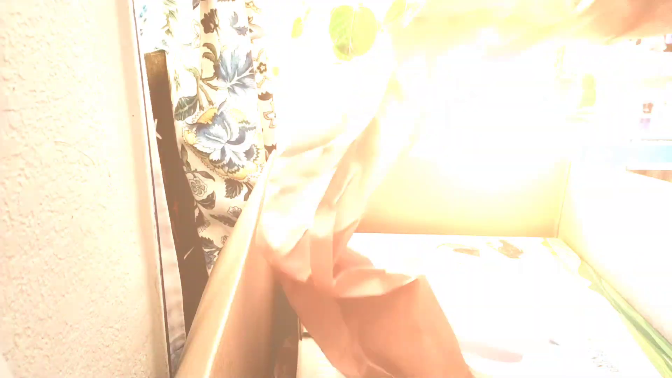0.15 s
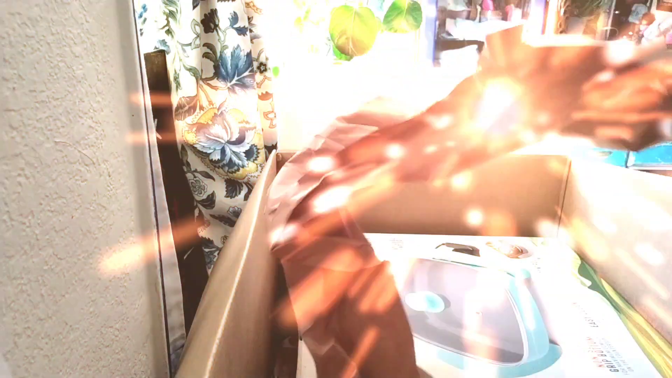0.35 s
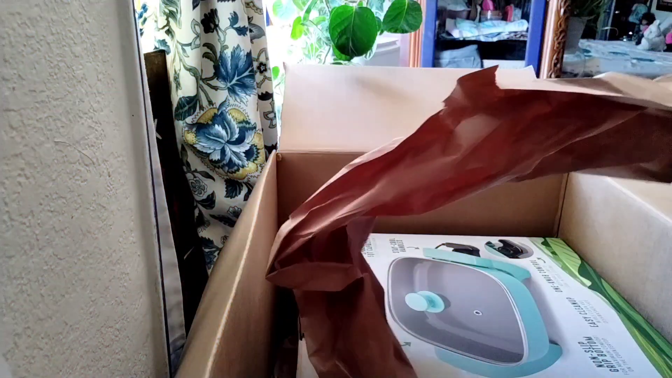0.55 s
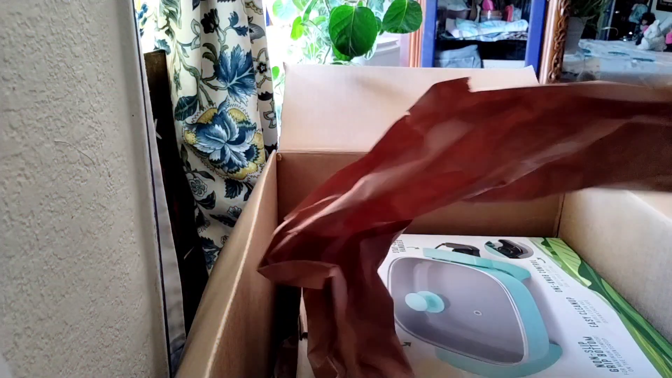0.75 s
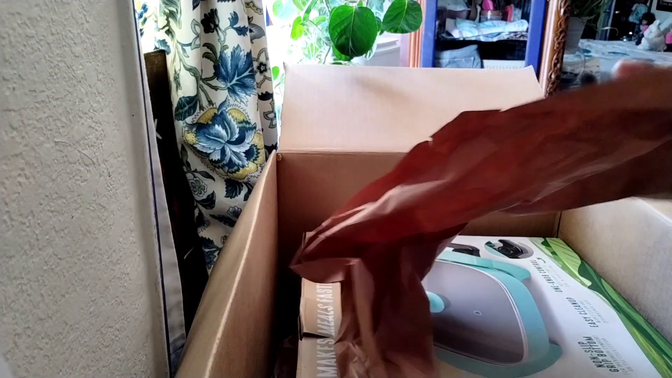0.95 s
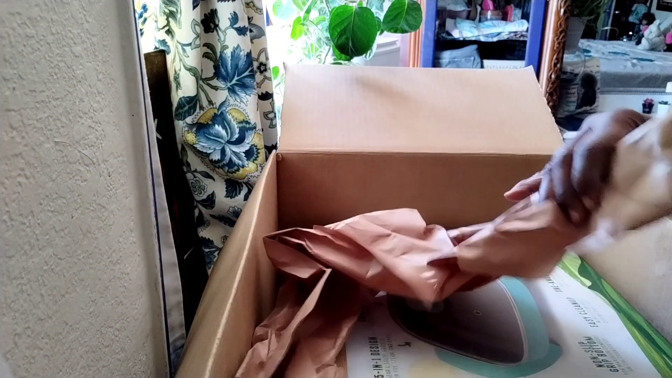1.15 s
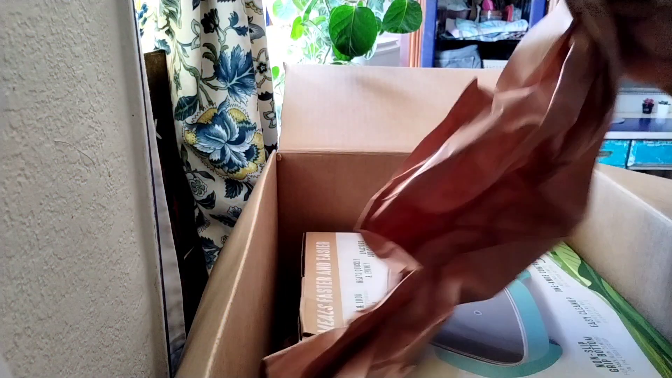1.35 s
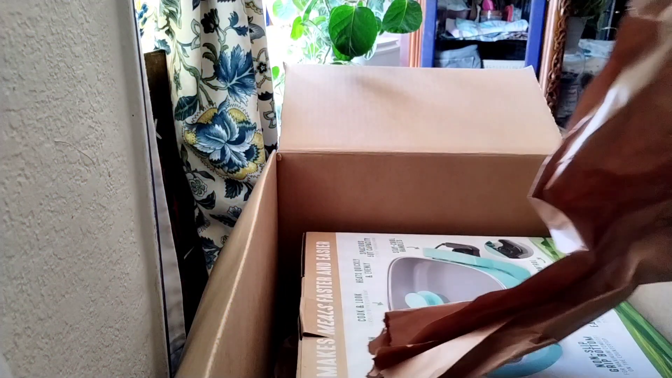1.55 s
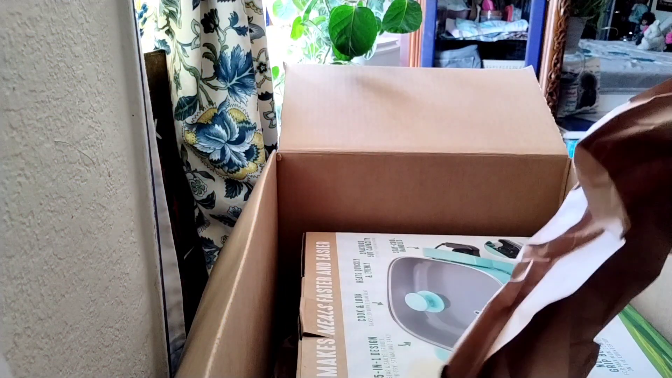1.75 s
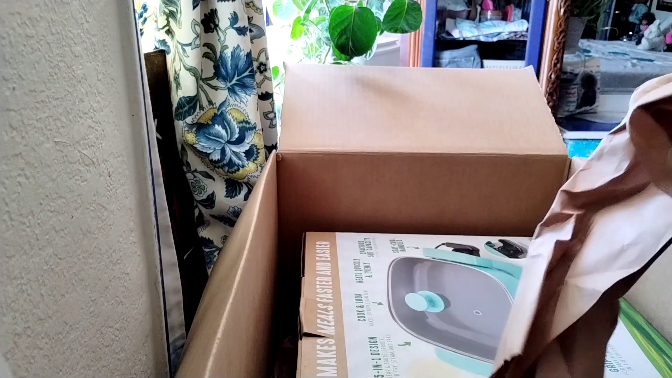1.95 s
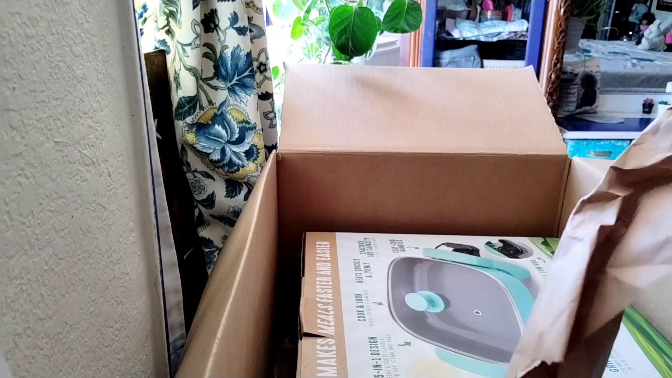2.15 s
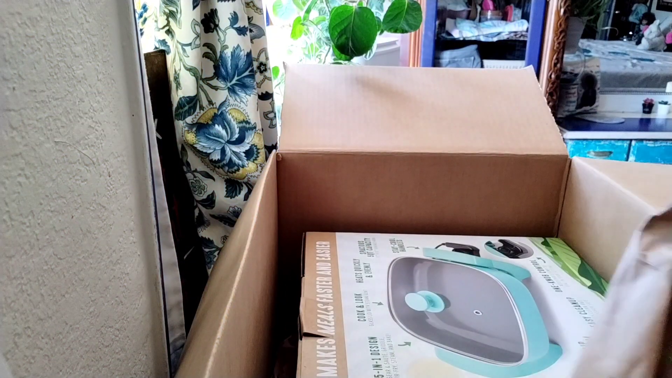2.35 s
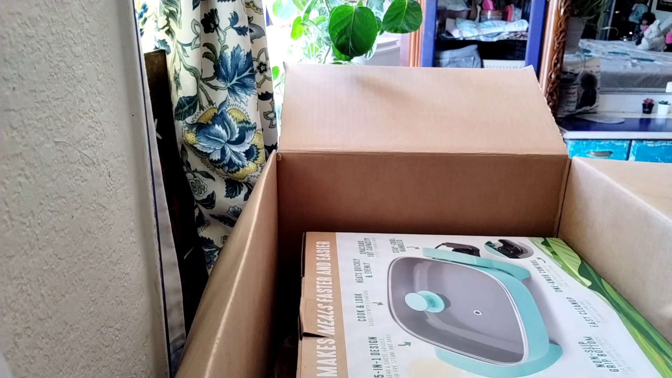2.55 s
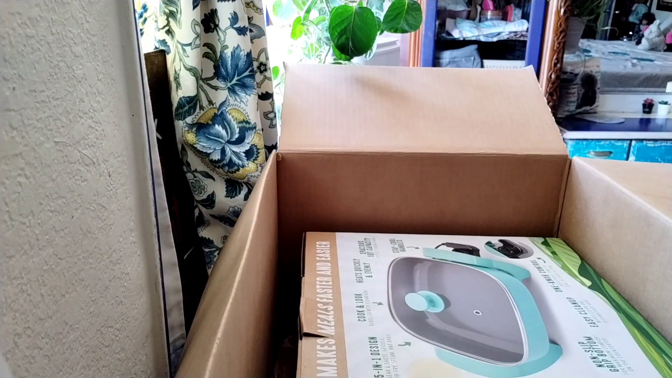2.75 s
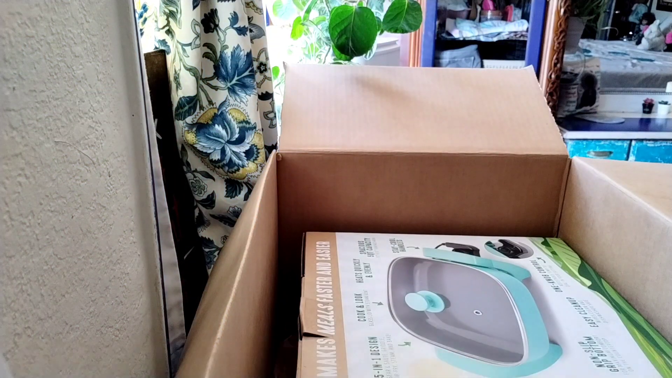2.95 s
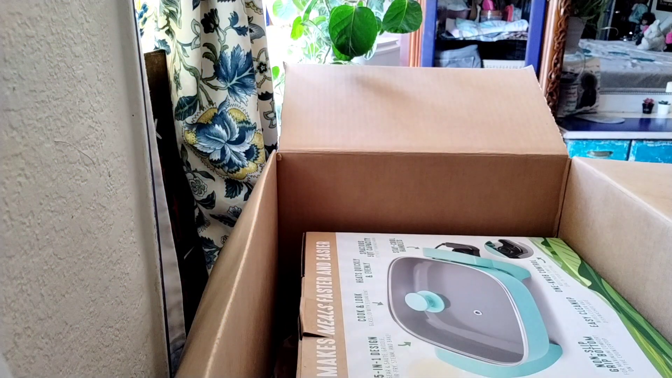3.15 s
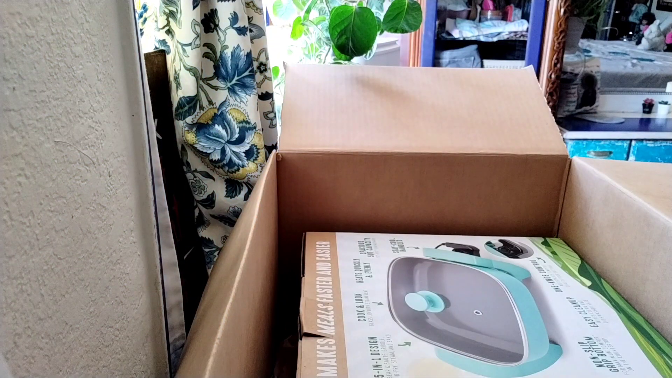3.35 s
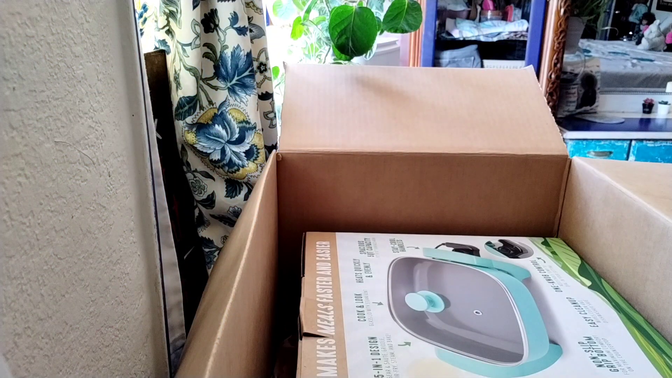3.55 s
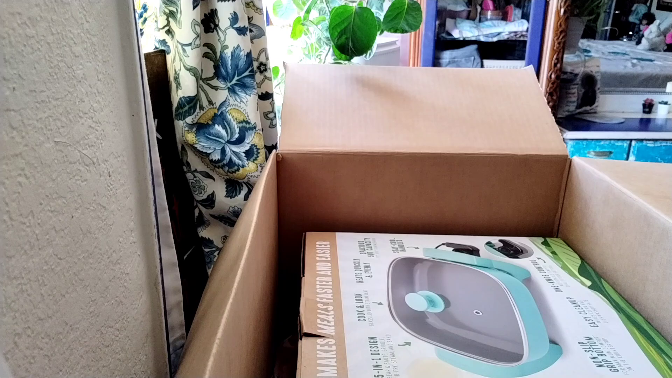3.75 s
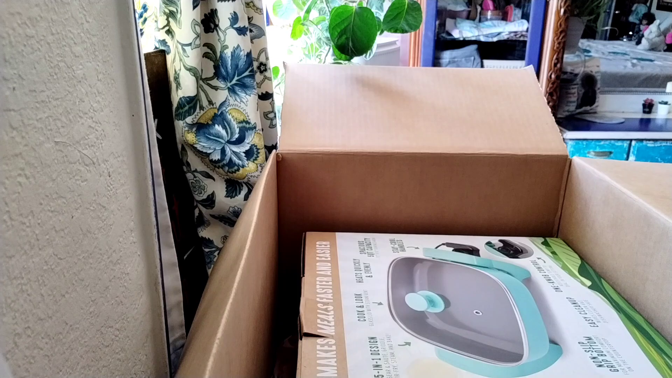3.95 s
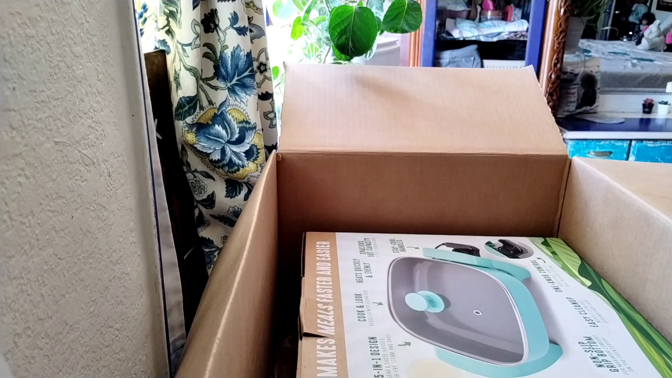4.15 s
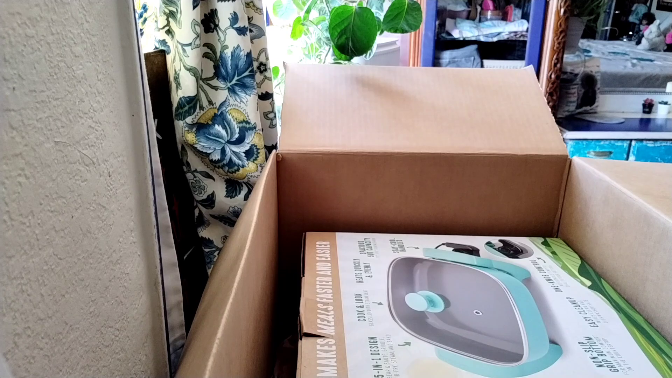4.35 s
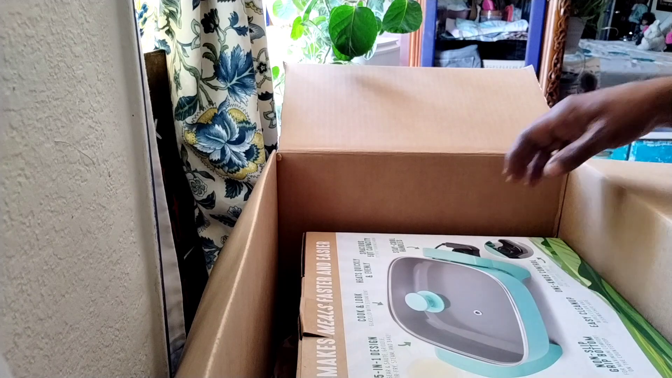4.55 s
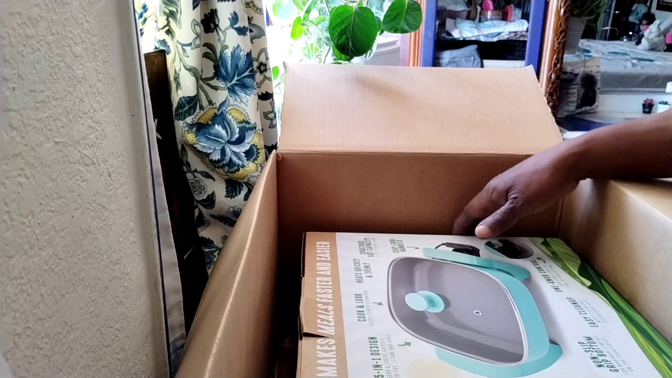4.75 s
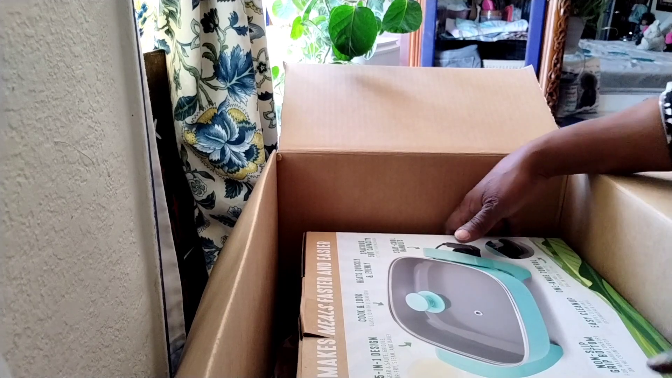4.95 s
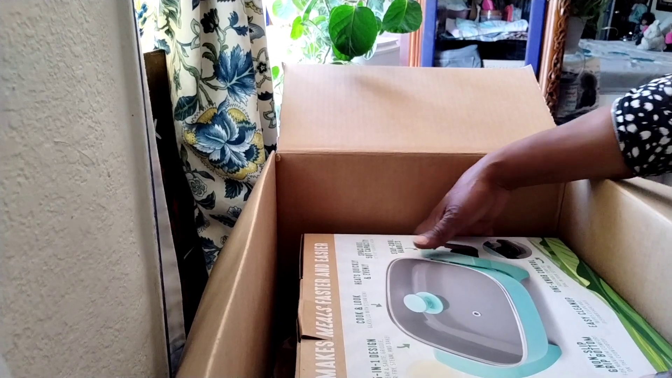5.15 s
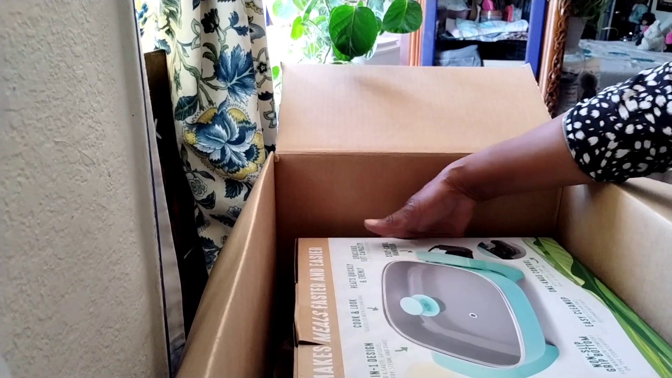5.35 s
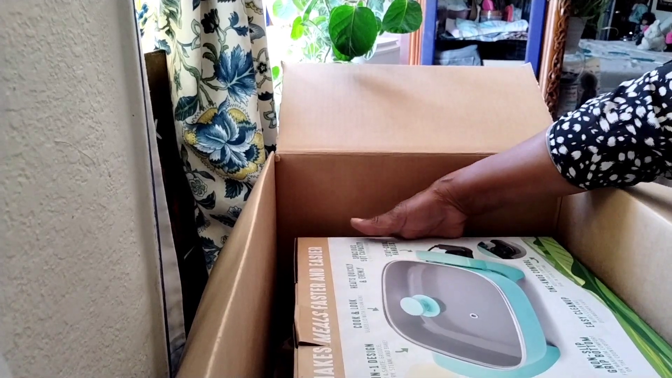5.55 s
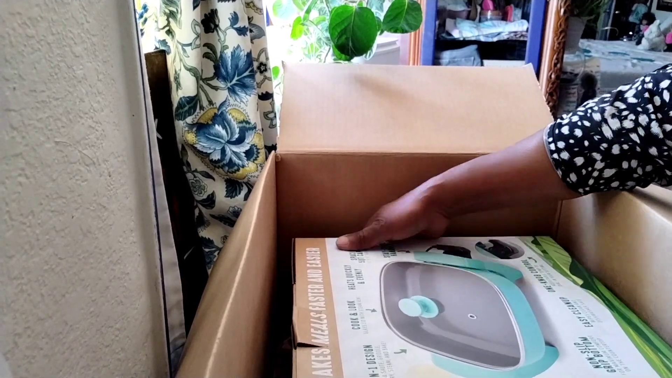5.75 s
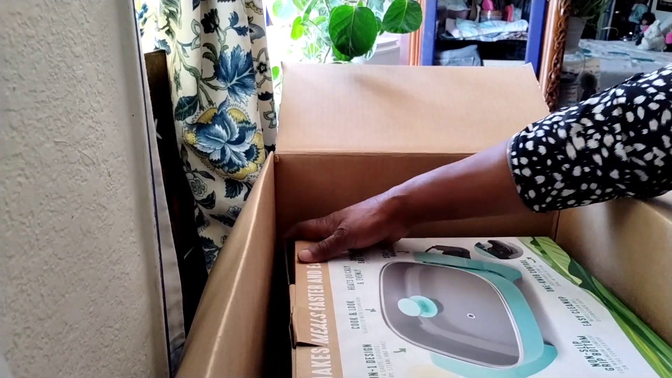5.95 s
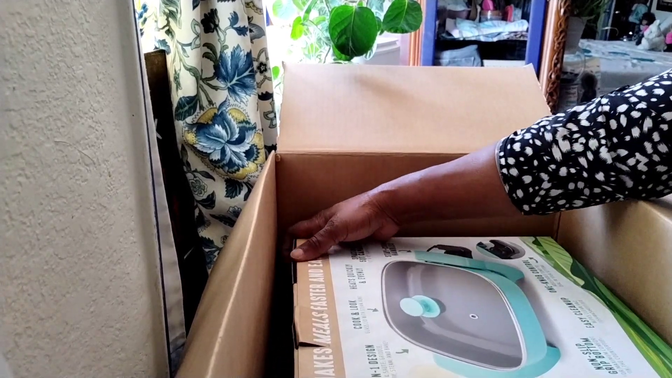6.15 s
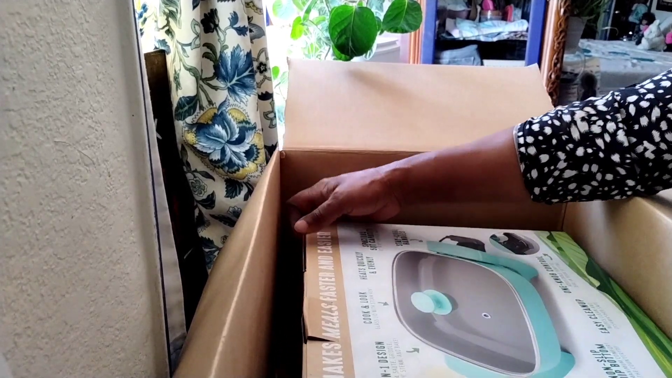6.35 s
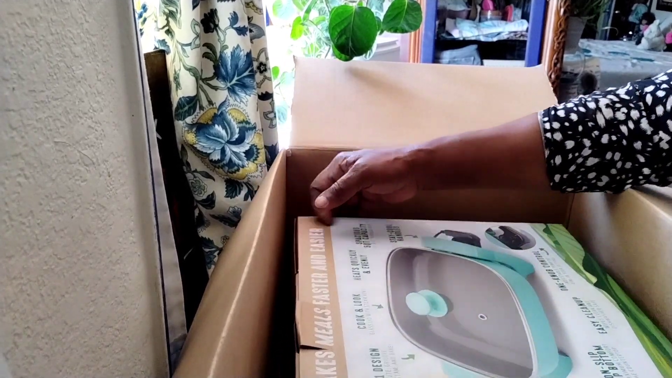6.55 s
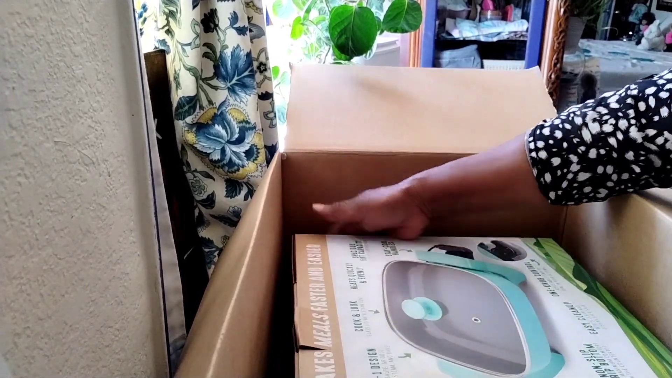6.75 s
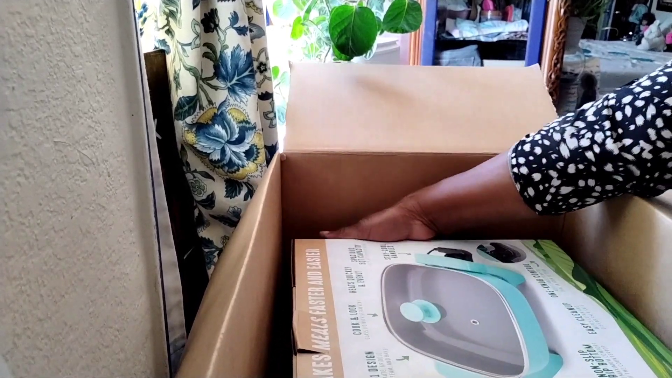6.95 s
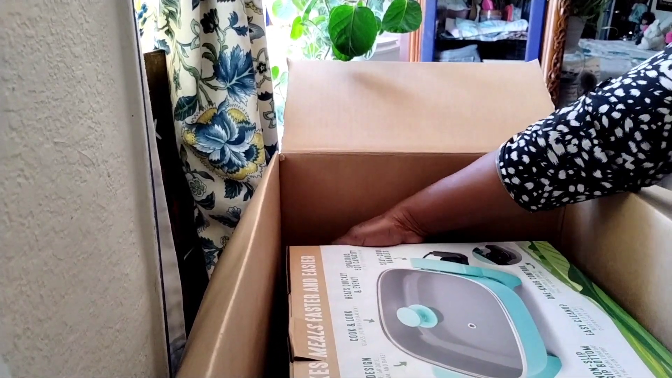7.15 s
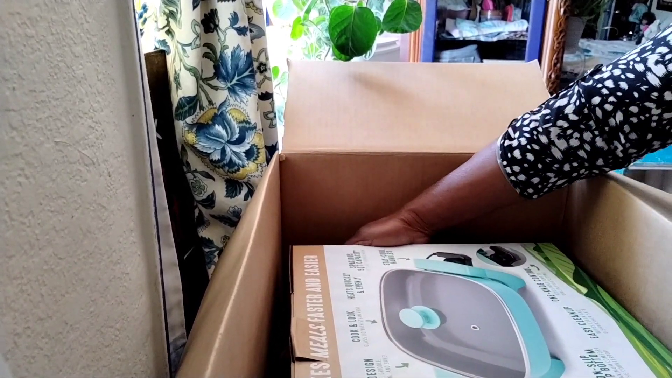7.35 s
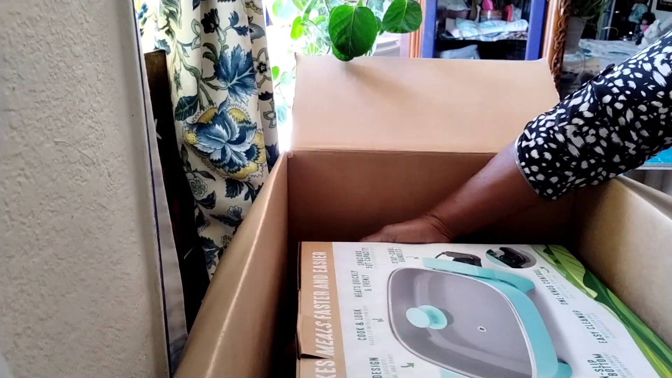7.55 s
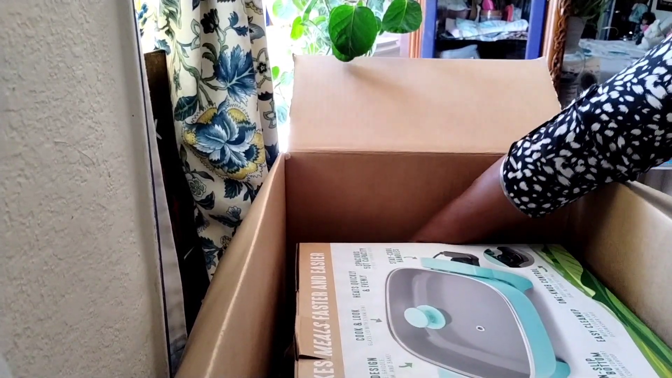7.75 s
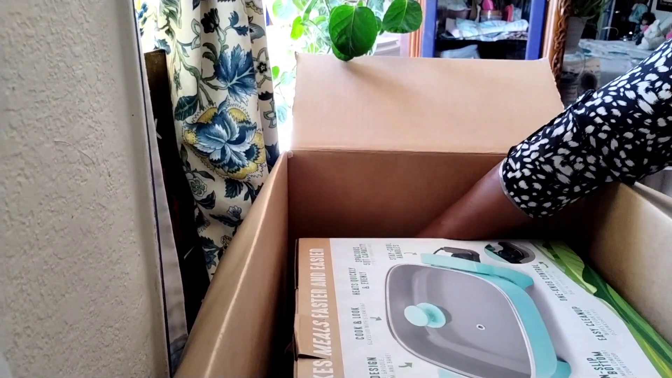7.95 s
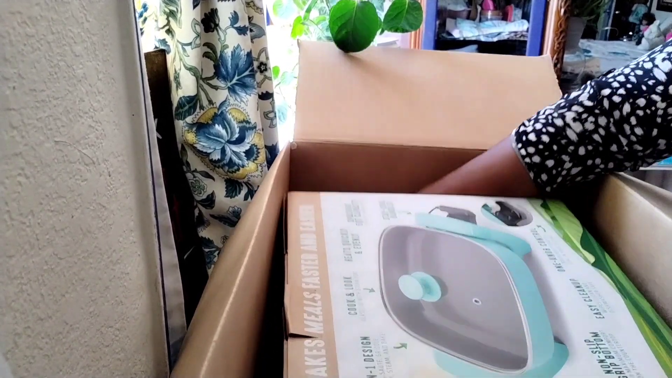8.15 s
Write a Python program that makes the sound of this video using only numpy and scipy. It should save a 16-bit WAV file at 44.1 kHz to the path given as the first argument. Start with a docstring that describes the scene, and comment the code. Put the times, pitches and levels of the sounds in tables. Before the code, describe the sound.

Close to the microphone, stiff packing paper is yanked from a cardboard box with loud, bright crackles and sharp snaps for under three seconds. The dropped sheet settles with sparse faint pops. Then a sleeve and hand brush the cardboard, with light scrapes, dry ticks and hollow knocks, one clearly stronger in the middle of that handling. A distant engine hums low, slowly rising, under quiet room tone.

```python
"""Stiff packing paper is dragged from a cardboard box, crumples and settles on a small room's floor.
Then an arm reaches in: sleeve and hand rub the walls; the carton inside is nudged, lifted and drops back.
Outside, an engine slowly gathers speed over the noise of the quiet room.
Creases, cloth and cardboard are shaped noise bursts; folds, panel modes and engine orders are sines."""
import sys
import numpy as np
from scipy import signal
from scipy.fft import rfft, irfft, next_fast_len
from scipy.io import wavfile

SR = 44100
rng = np.random.default_rng(int(sys.argv[2]) if len(sys.argv) > 2 else 0)


def bounce(signal):
    """Save signal as a 16-bit WAV file at the path given by the first command-line argument."""
    frames = np.transpose(np.atleast_2d(signal))
    limited = np.clip(frames, -1, 1)
    pcm = np.round(limited * 32767).astype(np.int16)
    wavfile.write(sys.argv[1], SR, pcm)


N = 361619
TIME = np.arange(N) / SR
TAIL = TIME[:2 ** 14]

# Levels in the tables are relative: source gains and filters follow.
# tugs on the paper: start_s, length_s, rustle_db, flapping_db
TUGS = [(-0.02, 0.054, -20.5, -41), (0.046, 0.25, -21, -42), (0.168, 0.19, -20.5, -40),
        (0.343, 0.025, -12, -35), (0.38, 0.046, -12.5, -35.5), (0.444, 0.14, -20.5, -45.5),
        (0.51, 0.13, -20.5, -41.5), (0.574, 0.11, -17, -46.5), (0.699, 0.078, -16.5, -44),
        (0.773, 0.11, -22.5, -43), (0.885, 0.28, -20, -47), (1.073, 0.2, -14, -35.5),
        (1.261, 0.25, -19, -43), (1.481, 0.048, -27, -45.5), (1.537, 0.59, -19, -44),
        (1.82, 0.32, -21.5, -46.5), (2.18, 0.64, -29.5, -53), (2.38, 0.37, -24.5, -58),
        (2.63, 0.13, -25.5, -46.5), (2.767, 0.04, -49, -38.5)]
# sheet tail dragging over the flap edge: start_s, length_s, level_db
FLAP_DRAGS = [(2.562, 0.06, -33), (2.62, 0.07, -41), (2.69, 0.1, -35), (2.77, 0.2, -49)]
# big creases snapping through: start_s, level_db, pitch_hz, fall_s
SNAPS = [(0.1913, -5.5, 2900, .0035), (0.23, -15, 2450, 0.0025), (0.3414, -8.5, 6040, 0.0026),
         (0.3605, -3.5, 8670, 0.0039), (0.3903, -12, 3440, .004), (0.4, -6.5, 8050, 0.0046),
         (0.4347, -3, 8500, 0.0028), (0.4839, -4, 9000, 0.0021), (0.5305, -5, 4000, 0.0038),
         (0.6368, -3, 8000, 0.0016), (0.659, -6.5, 7000, 0.0036), (0.7188, -9, 5370, 0.0021),
         (0.7312, -5.5, 8660, 0.0027), (0.741, -10.5, 7000, .004), (0.7844, -10, 4300, 0.0024),
         (0.7984, -4.5, 2780, 0.0016), (1.0041, -9, 7150, 0.0048), (1.0914, -7.5, 4460, .003),
         (1.0976, -5, 9260, .003), (1.114, -4, 4500, 0.0026), (1.1857, -3, 6900, 0.0036),
         (1.2589, -4.5, 2820, 0.0048), (1.3096, -12, 4600, .003), (1.3653, -2.5, 6400, 0.0031),
         (1.483, -2, 9100, 0.0014), (1.6533, -13.5, 7400, 0.0052), (1.6853, -4.5, 6750, 0.0046),
         (1.715, -1, 3480, 0.0022), (1.7458, -6.5, 8600, 0.004), (1.7787, -5, 2860, 0.0017),
         (1.784, -7.5, 3500, 0.0041), (1.878, -4, 4860, 0.0031), (1.8936, -4, 7400, 0.0035),
         (1.927, -4, 7500, 0.0033), (1.942, -11, 5000, 0.0018), (1.9664, -2.5, 4190, 0.0016),
         (2.0611, -4.5, 2550, 0.0027), (2.083, -5, 5370, 0.0026), (2.088, -2.5, 7900, 0.0026),
         (2.097, -3, 8060, 0.0022), (2.1431, -2, 7500, 0.0019), (2.261, -24, 2380, 0.0047),
         (2.3965, -6, 8360, 0.0021), (2.4414, -5.5, 3700, 0.0015), (2.4573, -14, 5870, 0.0032),
         (2.472, -8, 2430, .002), (2.5711, -10, 8540, 0.0013), (2.6355, -11, 7500, 0.0018),
         (2.6545, -7.5, 2070, 0.0038), (2.721, -15, 4500, 0.007)]
# sheet unfolding in fits on the floor: start_s, length_s, level_db
UNFOLDINGS = [(2.904, 0.083, -28.5), (3.0, 0.46, -43), (3.216, 0.018, -38), (3.36, 0.11, -39.5),
              (3.525, 0.038, -37.5), (3.575, 0.11, -36), (3.82, 0.053, -34), (3.945, 0.036, -41)]
# folds of the fallen sheet popping open: start_s, level_db, pitch_hz
POPS = [(2.9117, -21, 2070), (2.952, -18.5, 2840), (3.0536, -29, 2560), (3.2162, -18.5, 2500),
        (3.3505, -37, 2300), (3.3841, -29, 5990), (3.4834, -32.5, 2400), (3.527, -21.5, 2340),
        (3.6284, -29, 2500), (3.7435, -32.5, 2540), (3.8233, -26, 8800), (3.8571, -23.5, 8900),
        (3.9497, -30, 3030)]
# sleeve strokes along the box: start_s, length_s, level_db
SLEEVE_STROKES = [(4.06, 0.27, -45), (4.14, 0.2, -33.5), (4.32, 0.14, -30), (4.46, 0.25, -35.5),
                  (4.745, 0.15, -30), (4.87, 0.12, -34), (4.98, 0.091, -31.5), (5.09, 0.24, -38),
                  (5.33, 0.14, -36.5), (5.44, 0.14, -41.5), (5.52, 0.22, -52), (5.8, 0.17, -37),
                  (5.99, 0.081, -37), (6.255, 0.13, -41), (6.38, 0.27, -44), (6.57, 0.05, -33),
                  (6.62, 0.17, -40), (6.78, 0.19, -35.5), (7.21, 0.11, -37), (7.48, 0.12, -53.5),
                  (7.7, 0.14, -50), (7.76, 0.19, -41), (8.0, 0.62, -36)]
# cuff rasping on a cut cardboard edge: start_s, length_s, level_db
RASPS = [(4.352, 0.025, -23.5), (4.79, 0.23, -40), (5.41, 0.031, -34), (6.605, 0.027, -31.5),
         (6.742, 0.023, -30), (7.03, 0.028, -30), (7.88, 0.046, -33.5), (8.14, 0.072, -28.5)]
# shoves scraping the carton along the wall: start_s, length_s, level_db
SHOVES = [(4.75, 0.13, -32.5), (5.01, 0.13, -39), (5.29, 0.25, -42), (5.45, 0.29, -53), (5.55, 0.62, -54),
          (6.2, 0.54, -44), (6.58, 0.22, -36.5), (6.85, 0.075, -38), (6.99, 0.22, -40), (7.17, 0.18, -38.5),
          (7.46, 0.18, -48), (7.77, 0.2, -44), (7.87, 0.081, -42), (7.99, 0.26, -38), (8.09, 0.18, -40)]
# low shudder of the walls under the arm: time_s, level_db
SHUDDER = [(4.06, -81), (4.44, -53.5), (4.7, -57.5), (5.77, -44), (6.36, -52.5), (6.72, -45.5),
           (6.96, -49.5), (7.28, -48.5), (7.4, -54), (7.56, -52), (7.66, -76), (7.71, -56), (8.19, -60)]
# knocks on cardboard: start_s, level_db, tick_db, panel_pitch_hz
KNOCKS = [(4.495, -30.5, -26, 1210), (5.016, -17.5, -15.5, 620), (5.092, -27.5, -22, 560),
          (5.311, -30.5, -31, 454), (5.848, -32, -50, 890), (5.887, -28.5, -28.5, 610),
          (6.008, -25.5, -38, 890), (6.02, -22.5, -30.5, 645), (6.087, -31, -67, 583),
          (6.178, -33, -39, 418), (6.225, -30, -53, 634), (6.26, -31.5, -32.5, 680), (6.473, -30, -33, 600),
          (6.5657, -11.5, -10.5, 472), (6.571, -13, -23, 1670), (6.577, -20, -41, 740),
          (6.725, -30, -29, 605), (7.009, -23.5, -21.5, 480), (7.048, -48, -24, 594),
          (7.271, -26, -51, 500), (7.361, -36, -56, 385), (7.435, -32, -45, 400), (7.484, -33.5, -67, 516),
          (7.88, -21, -43, 1120), (8.02, -33, -24.5, 1110), (8.155, -18, -18, 1300)]
# cardboard edges slipping free: start_s, level_db, pitch_hz
TICKS = [(5.468, -32, 1600), (5.814, -34.5, 1810), (5.899, -25, 6550), (6.258, -28, 1800),
         (6.514, -26.5, 1800), (6.66, -27, 2570), (6.745, -23.5, 2890), (6.827, -25.5, 1330),
         (6.878, -22, 1800), (6.997, -25.5, 3820), (7.0121, -20.5, 1480), (7.137, -21.5, 2100),
         (7.273, -27.5, 1490), (7.932, -25, 1290), (7.972, -27, 1200), (8.142, -22, 1230)]
# wrist bumping the wall: start_s, level_db
BUMPS = [(5.609, -26.5), (5.645, -31), (5.751, -28), (5.83, -24), (5.854, -27), (5.896, -24), (6.08, -24.5)]
# carton modes: pitch_hz, level_db, t60_s (before the damping in knocks)
CARTON_MODES = [(143, -3, 0.6), (435, -13.5, 0.57), (527, 6, 0.045), (659, 5.5, 0.14), (882, 9.5, 0.01),
                (1240, -9.5, 0.32), (1740, -5.5, 0.19), (2490, -6.5, 0.14)]
# low wall modes: pitch_hz, level_db, t60_s
WALL_MODES = [(140, 5, 0.083), (210, -2.5, 0.098), (246, -8, 0.15)]
# engine outside: time_s, firing_rate_hz, level_db
ENGINE = [(1.6, 52, -63), (2.0, 62, -52), (2.38, 71, -55), (2.68, 73.3, -55), (3.07, 85, -52),
          (3.42, 88, -50.5), (4.0, 89, -53), (4.6, 91.4, -52.5), (4.85, 93, -56), (5.32, 96.3, -50),
          (6.1, 99.8, -50), (7.0, 105, -55)]
# engine orders: multiple_of_firing_rate, level_db
ENGINE_ORDERS = [(1, 0), (4 / 3, -7), (5 / 3, -14), (2, -7), (8 / 3, -9)]
# filter curves of the textures: frequency_hz, gain_db
PAPER_COLOUR = [(29, -40), (50, -10), (91, -16.5), (213, -1), (345, -15), (439, -9), (905, -6.5),
                (1070, -10), (1270, -4.5), (1820, -8), (2440, -5.5), (3100, -4), (7760, 0), (8970, 1),
                (11500, -11.5), (16000, -15.5)]
FALLEN_PAPER_COLOUR = [(210, -55), (350, -23), (467, -22.5), (506, -10.5), (653, -22), (817, -13),
                       (1010, -31), (1300, -16.5), (1910, -18), (2390, -17.5), (4040, -24.5), (8710, -15.5),
                       (16000, -34.5)]
SLEEVE_COLOUR = [(59, -39), (100, -29), (119, 4.5), (224, 12.5), (289, -0.5), (424, -9.5), (836, -6.5),
                 (1030, -14), (1230, -7.5), (1580, -11), (2800, -6.5), (4110, -11), (8640, 15), (16000, -4)]
BOARD_COLOUR = [(29, -14), (50, 0), (101, -16), (125, -2.5), (223, 0.5), (329, -19), (678, -18),
                (822, -23.5), (1100, -21), (1580, -26.5), (1820, -25), (3180, -30), (6090, -34)]
WHISPER_COLOUR = [(4000, -16), (7000, -8), (9000, 2.5), (11000, -10), (16000, -16.5)]
AMBIENCE_COLOUR = [(18, -36), (30, -26), (86, 4.5), (526, -15), (721, -10.5), (5740, -24.5), (8740, -17),
                   (16000, -39)]
SNAP_COLOUR = [(500, -4.5), (9000, 2.5), (11500, -0.5), (16000, -4.5)]
POP_COLOUR = [(600, -1.5), (2400, 0), (5000, -4.5), (8800, -1.5), (11500, -9), (16000, -11)]
TICK_COLOUR = [(400, 3), (1800, 2), (4500, -3.5), (7000, -7), (16000, -28)]
# left microphone port resonates in the treble: frequency_hz, left_minus_right_db
PORT_TILT = [(240, 1), (310, 6.5), (430, 0.5), (1000, -0.5), (2000, -3), (2800, 0.5), (4500, -5),
             (6900, 0.5), (8900, 12.5), (11000, 10), (15500, 3)]

AMBIENCE_DB = -50.5
DIP_AT_S, DIP_HALF_WIDTH_S, DIP_DB = 7.67, 0.05, -8
BOX_T60_S, ROOM_T60_S = 0.35, 0.22
CUTOFF_HZ = 16000
TUG_ATTACK_S, TUG_SAG_DB, TUG_RELEASE_S = 0.02, 4.5, 0.04
UNFOLD_ATTACK_S, UNFOLD_SAG_DB, UNFOLD_RELEASE_S = 0.0013, 5.5, 0.024
RASP_ATTACK_S, RASP_SAG_DB, RASP_RELEASE_S = 0.0011, 6.5, 0.02
RASP_LOW_HZ, RASP_HIGH_HZ = 2260, 4320
STROKE_EASE_S = 0.012
SNAP_PAN_DB, PAN_SCATTER_DB = -0.5, 1  # left minus right
FACET_HZ, FACET_WIDTH_HZ = 2380, 450
# bend: scale of the random phase curvature; fall: cycles to 1/e
FOLD_LOW_HZ, FOLD_HIGH_HZ, FOLD_FALL_CYCLES, FOLD_BEND_PER_S = 420, 2800, 7, 3
THUMP_LOSS_DB_PER_OCTAVE = 18  # above 400 Hz panel pitch: large, low panels move more air
BOOM_HZ, BOOM_HALF_WIDTH_HZ, BOOM_DB = 99, 3.2, 13


def from_db(db):
    """Amplitude factor of a level."""
    return 10 ** (np.asarray(db) / 20)


def rms_one(x):
    """Scales to rms 1."""
    return x / np.sqrt(np.mean(x ** 2) + 1e-20)


def in_time(rows):
    """One interpolated curve per column after the time."""
    time_s, *columns = np.transpose(rows)
    return [np.interp(TIME, time_s, column) for column in columns]


def during(rows):
    """Gate over the span of a table, with short fades."""
    first_s, last_s = rows[0][0], rows[-1][0]
    return np.interp(TIME, [first_s - .02, first_s, last_s, last_s + .04], [0, 1, 1, 0])


def panned(pan_db):
    """Left and right gains for a level difference."""
    return from_db(np.array([[.5], [-.5]]) * pan_db)


def drift(rate_hz):
    """Slow random curve of rms 1, with rate_hz knots per second."""
    knots = rng.standard_normal(4000)
    return rms_one(np.interp(TIME * rate_hz, np.arange(len(knots)), knots))


def band(x, low_hz, high_hz, order=3):
    """Causal band-pass."""
    edges_hz = [low_hz, min(high_hz, .48 * SR)]
    return signal.sosfilt(signal.butter(order, edges_hz, "band", fs=SR, output="sos"), x + 1e-18)


def convolve(x, response):
    """Convolution cut to the scene's length."""
    return signal.oaconvolve(np.atleast_2d(x), np.atleast_2d(response), axes=-1)[:, :N]


def coloured(x, points):
    """Causal minimum-phase filter through the points of a spectrum."""
    hz, db = np.transpose(points)
    grid_hz = np.fft.rfftfreq(4096, 1 / SR)
    gain_db = np.interp(np.log(grid_hz + 1), np.log(hz), db)
    cepstrum = irfft(np.log(from_db(gain_db)))
    # folding the cepstrum onto positive time gives minimum phase
    fold = np.r_[1, np.full(len(grid_hz) - 2, 2), 1, np.zeros(len(grid_hz) - 2)]
    return convolve(x, irfft(np.exp(rfft(cepstrum * fold))))


def add(out, start_s, sound):
    """Mixes a sound in at start_s."""
    start = round(start_s * SR)
    out[:, start:start + sound.shape[-1]] += sound[..., :N - start]


def port_noise(size, alike, lag):
    """Noise at two ports: same in the bass, partly alike above, late on the left by lag samples."""
    mid, side = rng.standard_normal((2, size))
    hz = np.fft.rfftfreq(size, 1 / SR)
    apart = (1 - np.clip(alike, 0, 1)) / (1 + (325 / (hz + 1)) ** 7)
    shared = rfft(mid) * np.sqrt(2 - apart)
    separate = rfft(side) * np.sqrt(apart)
    left = (shared + separate) * np.exp(-2j * np.pi * hz * lag / SR)
    return irfft([left, shared - separate], size) / np.sqrt(2)


def dying(t, fall_s, box_db, room_db):
    """Burst envelope: its own quick fall, dense reflections in the box, then the room's tail."""
    box = from_db(box_db - 60 * t / BOX_T60_S)
    room = from_db(room_db - 60 * t / ROOM_T60_S)
    return np.sqrt(np.exp(-2 * t / fall_s) + box ** 2 + room ** 2)


def grains(per_s, spread_db, colour_db, grain, hiss_db, alike, lag):
    """Tiny bucklings or slips of very uneven size, each a burst of its own colour, over a fine hiss."""
    out, edges_hz = 0, np.r_[45, 130, np.geomspace(320, 17000, 11)]
    noises = [port_noise(next_fast_len(N), alike, lag)[:, :N] for _ in range(2)]
    born = rng.random(N) < per_s / SR
    sizes_db = spread_db * np.minimum(rng.exponential(1, N), 2.7)
    for k, (low_hz, high_hz) in enumerate(zip(edges_hz, edges_hz[1:])):
        tint_db = colour_db * rng.standard_normal(N)[born].clip(-2, 2)
        energy = np.zeros(N)
        energy[born] = from_db(sizes_db[born] + tint_db) ** 2
        envelope = rms_one(np.sqrt(np.abs(convolve(energy, grain ** 2))))
        out = out + band(noises[k % 2] * np.hypot(envelope, from_db(hiss_db)), low_hz, high_hz, order=2)
    return out


def registers(x, split_hz):
    """Low, middle and top of a texture, each of rms 1."""
    bands_hz = [(60, 400), (400, split_hz), (split_hz, 18000)]
    return [rms_one(band(x, low_hz, high_hz, order=4)) for low_hz, high_hz in bands_hz]


def boxed(x, ring_db, wall_db):
    """Sound in the box stirs the carton's modes; a near wall returns it to each port a little later."""
    modes = sum(from_db(db) * signal.lfilter(*signal.iirpeak(hz, 14, fs=SR), x)
                for hz, db, _ in CARTON_MODES)
    echo = np.vstack([np.pad(side, (round(delay_s * SR), 0))[:N]
                      for side, delay_s in zip(x, [.0031, .0043])])
    return x + from_db(ring_db) * modes + from_db(wall_db) * band(echo, 960, 14000, order=1)


def surges(rows, attack_s, sag_db, release_s):
    """Gain of sudden movements: each rises, sags over its length, then dies away."""
    power = 0
    for start_s, length_s, db in rows:
        t = TIME - start_s
        held = np.clip(t / attack_s, 0, 1) * from_db(db - sag_db * np.clip(t / length_s, 0, 1))
        power = power + (held * np.exp(-np.clip(t - length_s, 0, 1) / release_s)) ** 2
    return np.sqrt(power)


def strokes(rows, speed_power):
    """Gain of sliding: speed follows an arch, loudness follows speed and eases out."""
    power = np.zeros(N)
    for start_s, length_s, db in rows:
        moving = (TIME > start_s) & (TIME < start_s + length_s)
        speed = np.abs(np.sin(np.pi * (TIME[moving] - start_s) / length_s))
        power[moving] += (from_db(db) * speed ** speed_power) ** 2
    keep = np.exp(-1 / (STROKE_EASE_S * SR))
    return np.sqrt(signal.lfilter([1 - keep], [1, -keep], power + 1e-18))


def crack(hz, low_hz, ring_db, alike, lag):
    """Broad noise of a break plus the ring of the facet beside it; rms 1."""
    broad = band(port_noise(len(TAIL), alike, lag), low_hz, 7200, order=1)
    facet = band(port_noise(len(TAIL), alike, lag), hz / 1.103, hz * 1.123, order=2)
    return rms_one(rms_one(broad) + from_db(ring_db) * rms_one(facet))


def pulled_paper(flap_db=2.5, crumple_db=-9.5, crackle_db=-3.2, fold_db=-18.5):
    """Each tug flaps the sheet, flips folds and crackles creases; its tail rumbles hollowly on the flap."""
    rustle_rows = [(s, length_s, db) for s, length_s, db, _ in TUGS]
    flap_rows = [(s, length_s, db) for s, length_s, _, db in TUGS]
    effort = surges(rustle_rows, TUG_ATTACK_S, TUG_SAG_DB, TUG_RELEASE_S)
    flapping = surges(flap_rows, TUG_ATTACK_S, TUG_SAG_DB, TUG_RELEASE_S)
    crease = dying(TAIL, fall_s=0.0015, box_db=-17, room_db=-35)
    creases = grains(per_s=520, spread_db=3.4, colour_db=4, grain=crease, hiss_db=-14, alike=0.2, lag=19.5)
    sheet = boxed(coloured(creases, PAPER_COLOUR), ring_db=-14, wall_db=-8)
    low, middle, top = registers(sheet, split_hz=2900)
    notes = folds() * from_db(fold_db)
    rustle = effort * (middle * from_db(crumple_db) + top * from_db(crackle_db) + notes)
    hollow = band(creases, 215, 280) + band(creases, 480, 850)
    rumble = rms_one(hollow) * strokes(FLAP_DRAGS, speed_power=0.31)
    return (rustle + low * flapping * from_db(flap_db) + rumble) * panned(-0.94)


def folds(count=480, spread_db=2.0):
    """Flipping folds ring a few cycles, pitches over nearly three octaves, bending as each opens; rms 1."""
    out = np.zeros((2, N))
    t = TAIL[:len(TAIL) // 4]
    places = rng.random((count, 4))
    shapes = rng.standard_normal((count, 3)).clip(-2, 2)
    for (when, place, *phases), (size, bend, side) in zip(places, shapes):
        hz = FOLD_LOW_HZ * (FOLD_HIGH_HZ / FOLD_LOW_HZ) ** place
        turns = hz * t * (1 + FOLD_BEND_PER_S * bend * t)
        envelope = (1 - np.exp(-turns / 2)) * np.exp(-hz * t / FOLD_FALL_CYCLES) * hz
        ring = np.sin(2 * np.pi * (turns + np.array(phases)[:, None])) * envelope
        add(out, when * TUGS[-1][0], ring * from_db(spread_db * size) * panned(PAN_SCATTER_DB * side))
    return rms_one(out)


def background():
    """Quiet room: coloured noise whose level dips briefly."""
    dip_db = DIP_DB * np.exp(-((TIME - DIP_AT_S) / DIP_HALF_WIDTH_S) ** 2)
    noise = port_noise(next_fast_len(N), alike=0.099, lag=0)
    return from_db(AMBIENCE_DB + dip_db) * rms_one(coloured(noise, AMBIENCE_COLOUR))


def snaps(rise_s=0.0006):
    """A big crease runs through the sheet in a few milliseconds; the facet beside it rings briefly."""
    out = np.zeros((2, N))
    for start_s, level_db, hz, fall_s in SNAPS:
        envelope = (1 - np.exp(-TAIL / rise_s)) ** 2 * dying(TAIL, fall_s, box_db=-26, room_db=-39)
        burst = crack(hz, low_hz=hz / 3, ring_db=-3, alike=0.25, lag=20.2)
        pan_db = SNAP_PAN_DB + PAN_SCATTER_DB * rng.standard_normal()
        add(out, start_s, burst * envelope * from_db(level_db) * panned(pan_db))
    return boxed(coloured(out, SNAP_COLOUR), ring_db=-9, wall_db=-11)


def engine(level_db=3.5):
    """Only the lowest orders come through the wall; the room booms as they pass its resonance."""
    firing_hz, engine_db = in_time(ENGINE)
    phase = 2 * np.pi * np.cumsum(firing_hz * (1 + 0.004 * drift(6))) / SR
    hum = 0
    for multiple, db in ENGINE_ORDERS:
        boom_db = BOOM_DB / (1 + ((multiple * firing_hz - BOOM_HZ) / BOOM_HALF_WIDTH_HZ) ** 2)
        hum = hum + np.sin(multiple * phase) * from_db(db + boom_db + 2 * drift(9.6))
    return hum * from_db(engine_db + level_db) * during(ENGINE)


def settling_paper(level_db=-0.5, facet_db=-12.0):
    """Sparse creases keep giving way, farther off, and set the stiff facets ringing."""
    unfolding = surges(UNFOLDINGS, UNFOLD_ATTACK_S, UNFOLD_SAG_DB, UNFOLD_RELEASE_S)
    crease = dying(TAIL, fall_s=0.002, box_db=-14, room_db=-20)
    creases = grains(per_s=120, spread_db=3.5, colour_db=6, grain=crease, hiss_db=-10, alike=0.15, lag=17.1)
    rustle = rms_one(boxed(coloured(creases, FALLEN_PAPER_COLOUR), ring_db=-35, wall_db=-2.5))
    half_hz = FACET_WIDTH_HZ / 2
    facets = rms_one(band(creases, FACET_HZ - half_hz, FACET_HZ + half_hz, order=2))
    return (rustle + facets * from_db(facet_db)) * from_db(level_db) * unfolding


def pops(level_db=-4.0):
    """Single folds spring open on the floor; the facet rings out and the room answers."""
    out = np.zeros((2, N))
    envelope = dying(TAIL, fall_s=0.0053, box_db=-15, room_db=-12)
    for start_s, pop_db, hz in POPS:
        burst = crack(hz, low_hz=1500, ring_db=-5, alike=0.15, lag=19.0)
        add(out, start_s, burst * envelope * from_db(pop_db + level_db))
    return coloured(out, POP_COLOUR)


def sliding(shudder_db=5.5, scrape_db=0.94, hiss_db=-3.0, rub_db=0.0):
    """Cloth hisses and rasps over the flap; deeper in, hand and carton stick and slip, walls shudder."""
    fibre = dying(TAIL, fall_s=0.0023, box_db=-6, room_db=-32)
    slip = dying(TAIL, fall_s=0.0025, box_db=-14, room_db=-54)
    catches = grains(per_s=680, spread_db=6.5, colour_db=4, grain=fibre, hiss_db=-25, alike=0.064, lag=9.2)
    cloth = coloured(catches, SLEEVE_COLOUR)
    slips = grains(per_s=220, spread_db=3.8, colour_db=4.5, grain=slip, hiss_db=-7, alike=0.43, lag=5.4)
    board = coloured(slips, BOARD_COLOUR)
    outer = registers(boxed(cloth, ring_db=-12, wall_db=-41), split_hz=4660)
    inner = registers(boxed(board, ring_db=-12, wall_db=-47), split_hz=7600)
    # against the smooth inner wall the sleeve only whispers
    whisper = coloured(port_noise(next_fast_len(N), alike=0.13, lag=5.1), WHISPER_COLOUR)
    inner[2] = registers(whisper, split_hz=4900)[2] * from_db(drift(30))
    depth = np.interp(TIME, [5.15, 5.6], [0, 1])  # how far the arm is inside
    sleeve = strokes(SLEEVE_STROKES, speed_power=0.39)
    shoves = strokes(SHOVES, speed_power=0.42) * from_db(scrape_db)
    scrape = np.hypot(shoves, sleeve * (1 - depth) * from_db(rub_db))
    shudder = from_db(in_time(SHUDDER)[0] + shudder_db) * during(SHUDDER)
    gains = [shudder, scrape, sleeve * from_db(hiss_db)]
    rasping = surges(RASPS, RASP_ATTACK_S, RASP_SAG_DB, RASP_RELEASE_S)
    rasp = rms_one(band(cloth, RASP_LOW_HZ, RASP_HIGH_HZ, order=2)) * rasping
    rubbing = sum(gain * (np.sqrt(1 - depth) * outside + np.sqrt(depth) * inside)
                  for gain, outside, inside in zip(gains, outer, inner))
    return rasp + rubbing


def knocks(damping=1.6, clack_db=-6.0, modes_db=-6.5, tick_gain_db=-3.5):
    """Contact gives a dull wall thump, a hollow panel clack, the carton's modes and a dry tick."""
    out = np.zeros((2, N))
    hz, mode_db, t60_s = np.transpose(CARTON_MODES)[:, :, None]
    for start_s, level_db, tick_db, panel_hz in KNOCKS:
        thump_db = level_db - THUMP_LOSS_DB_PER_OCTAVE * np.log2(panel_hz / 400)
        noise = port_noise(len(TAIL), alike=0.85, lag=5.9)
        scattered_db = mode_db + rng.normal(0, 0.63, (2, len(hz), 1))
        strengths = from_db(scattered_db) * rng.choice([-1, 1], hz.shape)
        decay = from_db(-60 * damping * TAIL / t60_s)
        modes = np.sum(strengths * np.sin(2 * np.pi * hz * TAIL) * decay, axis=1)
        thump = rms_one(band(noise, 81, 377, order=3))
        thump = thump * dying(TAIL, fall_s=0.011, box_db=-16, room_db=-14)
        clack = rms_one(band(noise, panel_hz / 1.42, panel_hz * 1.175, order=2))
        # falls over nine cycles, so low panels last longer
        clack = clack * dying(TAIL, fall_s=9 / panel_hz, box_db=-21, room_db=-10)
        tick = rms_one(band(noise, 3260, 9800, order=2))
        tick = tick * dying(TAIL, fall_s=0.0095, box_db=-19, room_db=-13)
        hollow = clack * from_db(clack_db) + modes / np.abs(modes).max() * from_db(modes_db)
        knock = thump * from_db(thump_db) + hollow * from_db(level_db)
        add(out, start_s, knock + tick * from_db(tick_db + tick_gain_db))
    return out


def ticks(level_db=-4.5):
    """A caught edge lets go with a short, dry, woody tick."""
    out = np.zeros((2, N))
    envelope = dying(TAIL, fall_s=0.006, box_db=-20, room_db=-26)
    for start_s, tick_db, hz in TICKS:
        burst = crack(hz, low_hz=900, ring_db=-1, alike=0.18, lag=5.3)
        add(out, start_s, burst * envelope * from_db(tick_db + level_db))
    return coloured(out, TICK_COLOUR)


def bumps(level_db=-5.0):
    """A soft contact stirs only the lowest wall modes, each with a strength of its own."""
    out = np.zeros((2, N))
    for start_s, bump_db in BUMPS:
        for hz, db, t60_s in WALL_MODES:
            gain = from_db(bump_db + level_db + db + rng.normal(0, 1.5))
            add(out, start_s, gain * np.sin(2 * np.pi * hz * TAIL) * from_db(-60 * TAIL / t60_s))
    return band(out, 78, 370, order=2)


def scene():
    """Paper first, then the arm in the box, over the engine and the quiet room."""
    paper = pulled_paper() + snaps() + settling_paper() + pops()
    arm = sliding() + knocks() + ticks() + bumps()
    return paper + arm + engine() + background()


def record(dry):
    """Each port has its own colour at the same total power; the top is cut."""
    hz, tilt_db = np.transpose(PORT_TILT)
    gains = panned(tilt_db)
    port_db = 20 * np.log10(gains / np.sqrt(np.mean(gains ** 2, axis=0)))
    heard = np.vstack([coloured(x, np.c_[hz, db]) for x, db in zip(dry, port_db)])
    return signal.sosfilt(signal.ellip(10, .3, 70, CUTOFF_HZ, fs=SR, output="sos"), heard).clip(-1, 1)


dry = scene()
out = record(dry)
bounce(out)
```